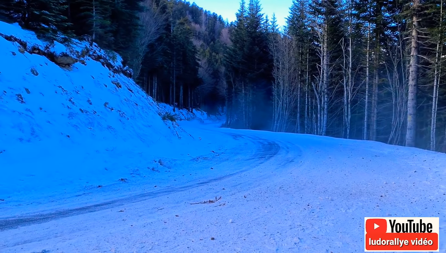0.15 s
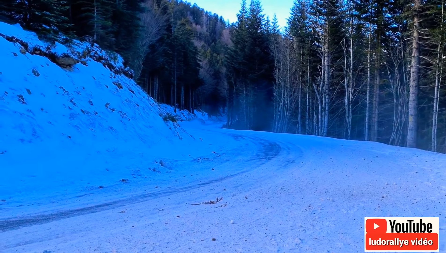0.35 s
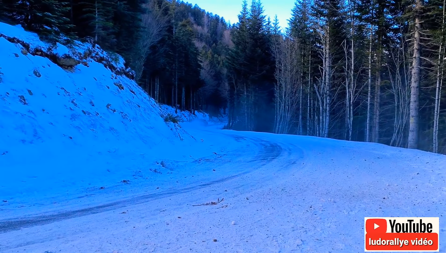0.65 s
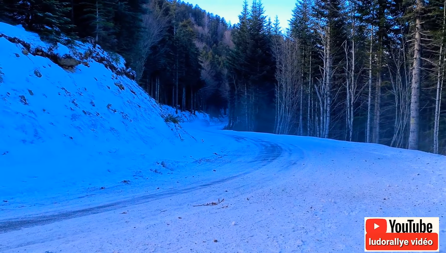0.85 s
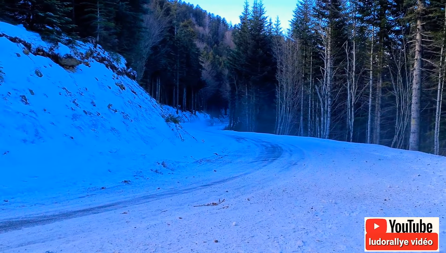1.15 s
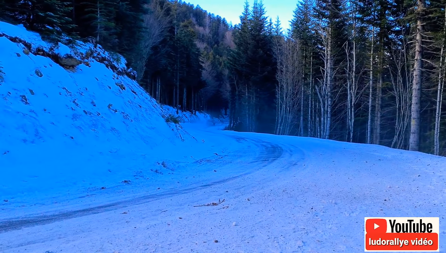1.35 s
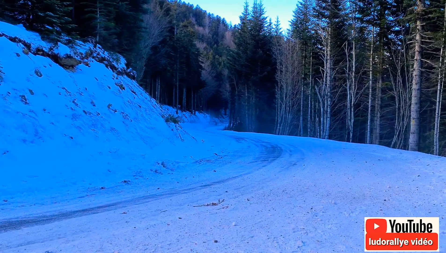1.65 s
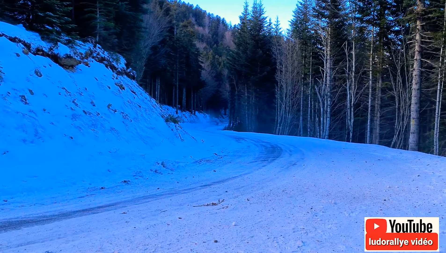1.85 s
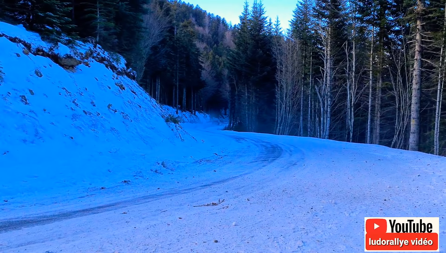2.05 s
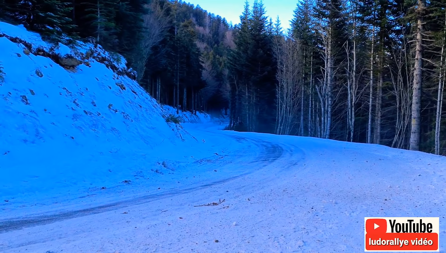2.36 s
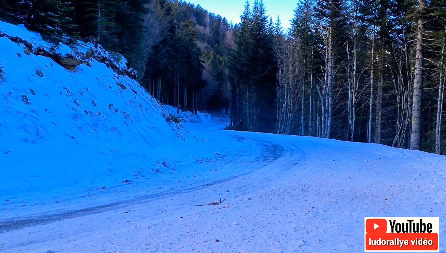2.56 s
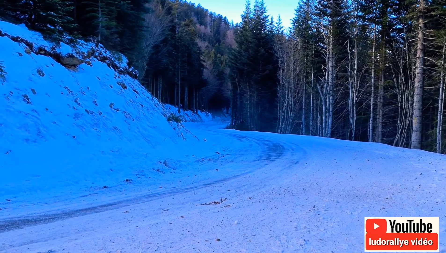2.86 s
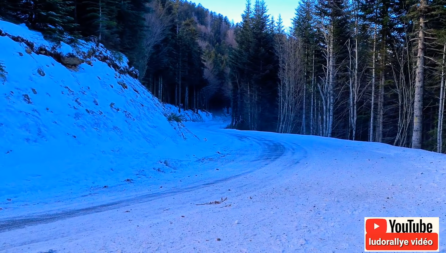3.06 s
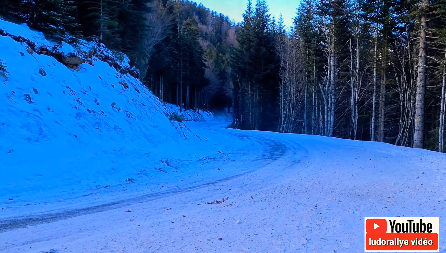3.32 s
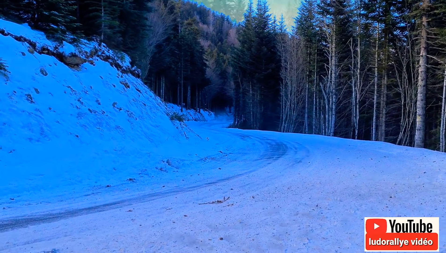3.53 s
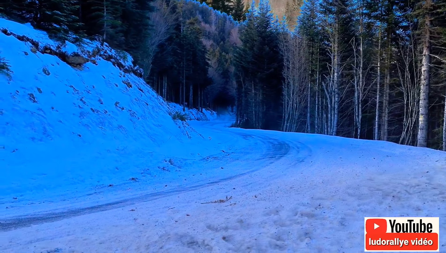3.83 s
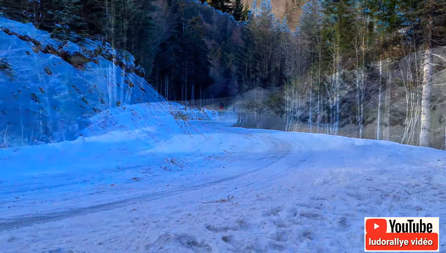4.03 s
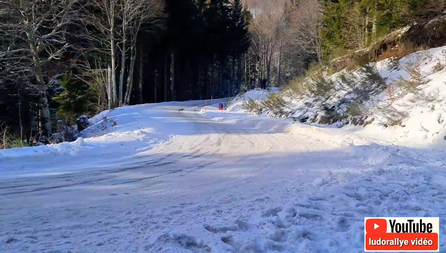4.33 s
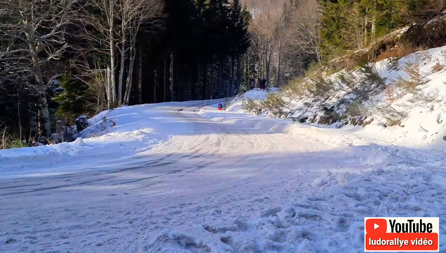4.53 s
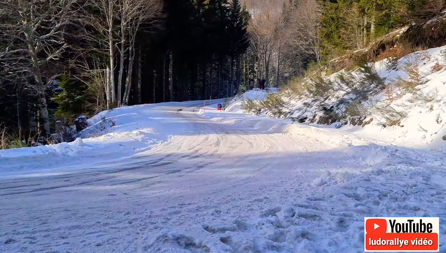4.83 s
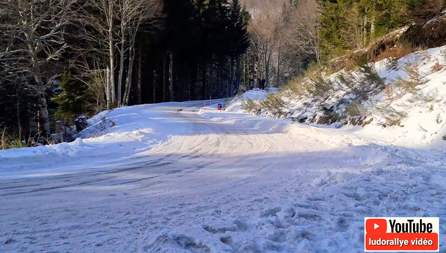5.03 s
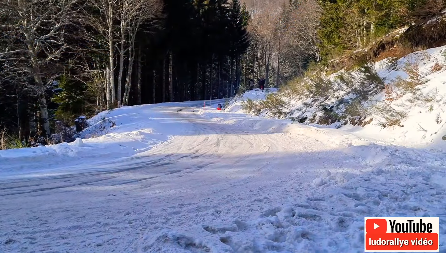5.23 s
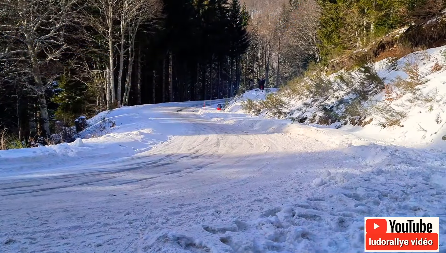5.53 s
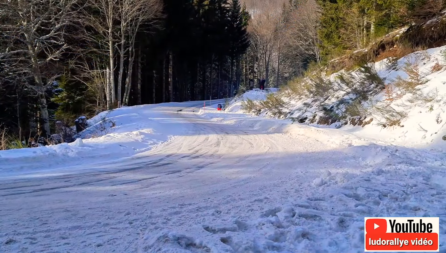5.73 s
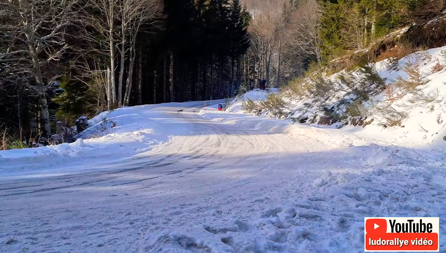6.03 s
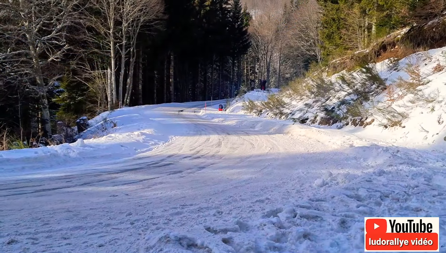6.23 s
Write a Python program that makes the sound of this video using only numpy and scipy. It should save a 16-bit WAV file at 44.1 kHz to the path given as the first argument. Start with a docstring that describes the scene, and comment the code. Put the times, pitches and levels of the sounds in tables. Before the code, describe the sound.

A rally engine rasps at full throttle close by, moving away over a gritty hiss of flung ice. A sharp backfire marks an upshift, then the exhaust crackles and fades to an uneven burble, echoing lightly among trees. Low gusts thump on the microphone while a second, distant engine rises in pitch and grows louder, its tyres rushing on packed snow.

```python
"""A snowy forest road, stereo microphone behind a four-cylinder turbo rally car. It pulls away,
wheels spinning and flinging ice, through two gear changes, the second with a bang. The driver lifts off,
unburnt fuel pops in the exhaust and the car burbles into the distance. Wind buffets the microphone, and
a far car comes on, accelerating, with tyre rush and a thin turbo whistle. Each engine note is a train
of firing pulses and gas puffs ringing in a tailpipe, echoed by snow banks and trunks."""
import sys
import numpy as np
from scipy import signal
from scipy.fft import rfft, irfft, next_fast_len
from scipy.io import wavfile
from scipy.ndimage import uniform_filter1d

SR = 44100
rng = np.random.default_rng(int(sys.argv[2]) if len(sys.argv) > 2 else 0)


def master_out(mix):
    """Clip the mix to full scale and print it as 16-bit PCM to the path in sys.argv[1]."""
    frames = np.transpose(np.atleast_2d(mix))
    ceiling = np.clip(frames, -1, 1)
    pcm = np.round(ceiling * 32767).astype(np.int16)
    wavfile.write(sys.argv[1], SR, pcm)


N = 281358
T = np.arange(N) / SR

CUT_S, RESUME_S, LIFT_S = 1.826, 1.885, 2.782  # throttle cut for the upshift, reopening, closed
SHUT_S, COAST_S = 0.00386, 3.22  # time the throttle takes to shut; end of the run-down

# Tailpipe resonances under throttle: pitch_hz, width_hz, lift_db
PULL_RESONANCES = [(830, 510, 5), (1270, 240, 6), (1905, 200, 13.5), (2330, 55, 5), (2723, 290, 8.5),
                   (3380, 330, 5.5), (4750, 180, 9.5), (5360, 86, 8), (9400, 7600, 5.5)]
# Tailpipe resonances off the throttle: pitch_hz, width_hz, lift_db
COAST_RESONANCES = [(224, 40, -6.5), (498, 44, 9.5), (703, 110, 5.5), (1160, 100, 1), (1920, 170, 11)]
# Spectrum of fuel going off in the pipe: frequency_hz, level_db
POP_SPECTRUM = [(40, -38.5), (130, -4.5), (260, 4), (400, -15), (520, -3.5), (740, 3.5), (860, -3.5),
                (1020, -15), (1300, -0.5), (1650, -20.5), (1950, -30), (2400, -37), (4000, -78)]
# Dabs of throttle while coasting: peak_s, length_s, lift_db
THROTTLE_DABS = [(3.278, .08, 6.5), (3.369, .11, 9), (3.497, .06, 8), (3.626, .08, 6), (3.778, .09, 8.5),
                 (3.868, .05, 4), (3.952, .06, 4), (4.084, .08, 4.5)]


def departing_car():
    """Under throttle, the tailpipe pointing back down the road at the microphone."""
    # Roughness of the firing: time_s, unevenness (0-1), jet_db
    roughness = [(0, .26, 5), (.95, .28, 4.5), (1.1, .17, 1.5), (1.8, .21, 3), (1.95, .32, 5),
                 (2.3, .27, 3.5), (2.7, .29, 4)]
    # Tailpipe spectrum: frequency_hz, level_db
    pipe_spectrum = [(40, -48.5), (120, -14.5), (200, -3.5), (300, -1.5), (400, -11), (490, -9.5), (560, 0),
                     (650, 5.5), (870, 0), (1000, -17), (1100, -14.5), (1450, -13.5), (1680, -27.5),
                     (3500, -35), (5600, -45.5), (7000, -67), (16000, -85.5)]
    # Wheelspin, then the two pulls: time_s, bass_db, middle_db, treble_db
    wheelspin = [(0.0, -14, -24, -39), (0.122, -13, -25.5, -43), (0.178, -17, -23.5, -43),
                 (0.196, -20, -27.5, -44), (0.48, -16.5, -25, -42.5), (0.53, -15.5, -29.5, -36.5),
                 (0.556, -15.5, -19.5, -46), (0.66, -17, -18.5, -40.5), (1.035, -15, -19, -38)]
    first_pull = [(1.066, -20, -14.5, -39.5), (1.166, -27, -18.5, -40), (1.494, -20, -20, -34.5),
                  (1.53, -17.5, -17, -38), (1.786, -20.5, -19.5, -39.5), (1.81, -19.5, -21, -46)]
    second_pull = [(1.9, -28.5, -20.5, -39.5), (2.008, -30, -20.5, -49), (2.302, -24, -21, -42.5),
                   (2.346, -23, -17.5, -41), (2.508, -22.5, -20, -39.5), (2.72, -24, -16.5, -39)]
    # Bands around the second (drone) and fourth (howl) harmonics: time_s, level_db
    drone_curve = [(.08, -29.5), (.21, -38.5), (.45, -24.5), (.88, -28.5), (.97, -35.5), (1.08, -25.5),
                   (1.27, -21.5), (1.4, -26.5), (1.55, -27), (1.72, -32), (1.92, -36), (2.25, -25.5),
                   (2.6, -23), (2.75, -26)]
    howl_curve = [(.1, -4), (.17, -2.5), (.3, 4.5), (.42, -1.5), (.58, -1), (.78, -8.5), (.95, -2.5),
                  (1.06, 4), (1.25, 1), (1.4, -7), (1.6, 0.5), (1.78, -7.5), (1.95, -2.5), (2.7, -5)]
    # The note falters as the spinning wheels catch: centre_s, length_s, change_db
    stumbles = [(.143, 0.016, -1.5), (.218, 0.037, -7.5), (.515, 0.033, -0.5), (.616, 0.023, -7)]
    uneven, jet_db = along(roughness)
    gas = exhaust(revs(), uneven, jet_db, waver=.009, chance=.38, stagger=.11, duty=.25)
    pipe = colour(gas, pipe_spectrum, PULL_RESONANCES)
    pipe = pipe + amp(-4) * scatter(above(pipe, 1000), t60=.12, per_s=700)
    pipe = pipe + amp(-9) * scatter(above(pipe, 1000), t60=.15, per_s=900, channels=2)
    pipe = pipe + amp(-11) * scatter(above(pipe, 2200), t60=.1, per_s=700, channels=2)
    pipe = flutter(pipe, above_hz=600, depth_db=3.4, patch_hz=300)
    off_boost = ramp(CUT_S, SHUT_S) - ramp(1.8, 0.21)  # a thin snarl until the boost returns
    low, middle, howl, high = registers(pipe, [630, 745, 1030])
    pipe = low * amp(-13 * off_boost) + middle + howl * amp(along(howl_curve)[0]) + high
    cut_db, reopen_s = -10.5, 0.12
    cut = ramp(CUT_S, SHUT_S) - ramp(RESUME_S - reopen_s / 2, reopen_s)
    throttle = amp(cut_db * cut) * (1 - ramp(LIFT_S, SHUT_S))
    boom, body, rasp = along(np.vstack([wheelspin, first_pull, second_pull]))
    drone = along(drone_curve)[0]
    bark = 1 + 0.49 * rasp + 0.51 * body  # the upper harmonics lie between middle and treble
    falter = bumps(stumbles)
    levels = [boom, drone + falter / 2, body + falter + 0.1 * shudder(), bark + falter / 2, rasp]
    return throttle * voiced(pipe, [294, 490, 1030, 2130], levels, sway_db=0.8)


def exhaust(firing_hz, uneven, jet_db, waver, chance, stagger, duty):
    """One pressure pulse per firing, each followed by a puff of turbulent gas."""
    # Strength of each of the four cylinders at full unevenness: offset (share of a plain firing)
    cylinders = [0.43, -0.034, 0.51, 0.3]
    # Spectrum of the gas jet ahead of the pipe's colour: frequency_hz, level_db
    jet_spectrum = [(100, -21), (700, -19), (1050, -8), (1400, -5), (2200, -3), (3500, 1), (7000, 5)]
    phase = np.cumsum(firing_hz * (1 + waver * drift(35.5))) / SR
    firings = np.arange(1, int(phase[-1]))
    luck, late = rng.standard_normal((len(firings), 2)).T
    odd = np.interp(firings, phase, uneven)
    bias = np.resize(cylinders, len(firings))
    strength = np.maximum(1 + odd * (bias + chance * luck), .05)
    lag = stagger * odd * (chance * late - bias)  # weak firings leave late
    at = np.clip(np.interp(firings + lag, phase, np.arange(N)), 0, N - 2)
    sample, fraction = at.astype(int), at % 1
    pulses = np.bincount(sample, strength * (1 - fraction), N)
    pulses += np.bincount(sample + 1, strength * fraction, N)
    puff = (.4 + np.exp(-(phase % 1) / duty)) * np.interp(phase, firings, strength)
    puff *= amp(2.8 * drift(35))
    noise = rng.standard_normal((2, N))
    noise = noise + below(noise[0] - noise, 1200, order=4)  # the lows reach left and right alike
    return unit(pulses) + amp(jet_db) * colour(unit(noise * puff), jet_spectrum)


def revs():
    """Firings per second: the first pull, a shuddering climb after the upshift, then the run-down."""
    # Wheelspin and first pull, dropping at the first gear change: time_s, firing_hz
    first_revs = [(0.0, 223), (0.075, 232), (0.126, 225), (0.16, 211), (0.2, 227), (0.25, 217), (0.33, 204),
                  (0.37, 211), (0.47, 216), (0.52, 212), (0.565, 204), (0.605, 220), (0.655, 208),
                  (0.76, 219), (0.83, 222), (0.87, 232), (0.925, 224), (0.98, 224.5), (1.03, 223),
                  (1.06, 199.4), (1.245, 198), (1.39, 200), (1.6, 213), (1.73, 211), (1.775, 201),
                  (1.82, 233)]
    grip_s, climb_hz_per_s, run_down_hz_per_s, dab_hz_per_db = 1.05, 18, 150, 1.43
    first = along(first_revs)[0] * (1 + .011 * drift(13) * (T < grip_s))  # wavers while the wheels spin
    second = (173.1 + climb_hz_per_s * (T - RESUME_S)) * (1 + .037 * shudder())
    coast = 108.8 + run_down_hz_per_s * np.maximum(COAST_S - T, 0) + dab_hz_per_db * bumps(THROTTLE_DABS)
    return np.select([T < CUT_S + SHUT_S, T < LIFT_S], [first, second], coast)


def shudder():
    """The drivetrain winds up and unwinds after the upshift, a swing from -1 to 1."""
    # Crests of the swing: time_s
    crests = [1.88, 1.978, 2.075, 2.168, 2.268, 2.37, 2.483, 2.585, 2.675, 2.77]
    return np.cos(2 * np.pi * np.interp(T, crests, np.arange(len(crests)))) * (T > CUT_S + SHUT_S)


def coasting_car():
    """Rolling away off the throttle, the cylinders fire unevenly and the pipe rings on between them."""
    # Tailpipe spectrum: frequency_hz, level_db
    pipe_spectrum = [(50, -27), (120, -15), (225, 3.5), (330, -9.5), (490, -3), (600, -3.5), (760, -0.5),
                     (860, -10.5), (980, -15.5), (1350, -2.5), (1650, -20), (3000, -40), (5400, -51.5),
                     (7000, -86.5), (16000, -89.5)]
    # Body, bark and rasp of the engine: level_db, fade_db_per_s, share (of each dab's lift)
    bands = [(-27, 5.5, 0.9), (-44.5, 8, 0.43), (-63, 6, 0.32)]
    dabs = bumps(THROTTLE_DABS)
    uneven = .62 - .045 * dabs  # each dab steadies the firing
    gas = exhaust(revs(), uneven, jet_db=3, waver=.02, chance=.6, stagger=.1, duty=.2)
    pipe = colour(gas, pipe_spectrum, COAST_RESONANCES)
    echoes = scatter(pipe, t60=.3, per_s=900) + scatter(above(pipe, 1100), t60=.12, per_s=1200)
    pipe = flutter(pipe + amp(-4) * echoes, above_hz=1300, depth_db=4, patch_hz=450)
    dip_db = -15.5 * (1 - ramp(COAST_S - .05, 0.026))  # quieter under the thick of the pops
    levels = [db - fade * (T - COAST_S) + share * dabs + dip_db for db, fade, share in bands]
    in_earshot = ramp(LIFT_S, SHUT_S) - ramp(4.217, 0.15)
    return voiced(pipe, [1000, 2200], levels, sway_db=0.5) * in_earshot


def backfires():
    """A shock and a flame, a ringing pipe, a ragged low tail and a hiss of escaping gas."""
    # Bangs at the upshift and the lift-off: start_s, level_db
    bangs = [(1.8542, -0.5), (2.774, -5.5)]
    # Spectrum of shock and flame: frequency_hz, level_db
    bang_spectrum = [(30, -29.5), (120, 0), (250, 0.5), (420, -0.5), (600, 5.5), (850, -2), (1100, -17.5),
                     (1800, -11), (2500, -23.5), (5300, -27), (7500, -40), (11000, -34.5), (16000, -59)]
    hiss_spectrum = [(2000, -22.5), (5000, 0.5), (9000, -6.0), (16000, -13.0)]
    out, t = np.zeros((2, N)), T[:9000]
    shock = colour(1. * (t == 0), bang_spectrum)
    shock = shock / abs(shock).max()
    ring = np.sin(2 * np.pi * 800 * t) * np.exp(-t / 0.0094)
    for s, db in bangs:
        flame = unit(colour(rng.standard_normal(len(t)), bang_spectrum)) * np.exp(-t / 0.0097)
        tail = unit(colour(rng.standard_normal(len(t)), POP_SPECTRUM)) * np.exp(-t / 0.014)
        grumble = unit(registers(rng.standard_normal(len(t)), [70, 520])[1]) * np.exp(-t / 0.087)
        hiss = colour(rng.standard_normal((2, len(t))), hiss_spectrum) * np.exp(-(t / 0.097) ** 2)
        add(out, s, amp(db - 2.5) * shock + amp(db - 16) * ring + amp(db - 12) * flame)
        add(out, s, amp(db - 12) * tail + amp(db - 42.5) * hiss + amp(db - 26) * grumble)
        add(out, s + .0032, amp(db - 7) * shock)  # bounce off the road
    return out


def pops():
    """Unburnt fuel flares in the pipe: a ringing thud and a crackle, run together by the snow banks."""
    # Flares in twos and threes, then fading sputters: start_s, level_db, crackle_offset_db
    flares = [(2.755, 1, -17.5), (2.769, -6.5, -5), (2.779, -10, -25), (2.811, -6.5, -21),
              (2.821, -5, -10.5), (2.838, -29, -26), (2.858, -10.5, -13.5), (2.876, -13.5, -20.5),
              (2.913, -10, -23), (2.93, -12, -26), (2.958, -7, -18.5), (2.976, -10.5, -20),
              (3.009, -8.5, -18.5), (3.024, -15, -28), (3.062, -7, -19.5), (3.079, -13.5, -18),
              (3.108, -10, -24), (3.119, -13, -27), (3.133, -16.5, -22.5), (3.149, -8, -16),
              (3.166, -18.5, -26.5), (3.203, -11.5, -33), (3.222, -16.5, -22.5), (3.281, -17.5, -20.5),
              (3.342, -16.5, -24), (3.38, -19.5, -22.5), (3.476, -22.5, -27.5), (3.497, -18.5, -24),
              (3.572, -26.5, -30), (3.611, -18.5, -29), (3.638, -24, -25.5), (3.745, -26, -22),
              (3.764, -16.5, -28)]
    # Thud, ring and bark of every pop: offset_db
    band_levels = [-22, -15.5, -25.5]
    # Spectrum of the crackle: frequency_hz, level_db
    crackle_spectrum = [(800, -20), (2000, 9.5), (2700, 9), (4000, 2.5), (5000, 4.5), (7000, -22),
                        (11000, -35), (16000, -41)]
    rise_s, burn_s = 0.0024, 0.0059
    out, t = np.zeros((2, N)), T[:2600]
    envelope = np.exp(-t / burn_s) * (1 - np.exp(-t / rise_s))
    for s, db, crackle_db in flares:
        flare = rng.standard_normal((3, len(t))) * envelope
        ringing = colour(flare[0], POP_SPECTRUM, COAST_RESONANCES)
        for band, band_db in zip(registers(ringing, [400, 1030]), band_levels):
            add(out, s, amp(db + band_db) * unit(band))
        crackle = colour(flare[1:] * np.minimum(t / 0.004, 1), crackle_spectrum)
        add(out, s, amp(db + crackle_db - 19) * unit(crackle))
    return out + amp(-11.5) * scatter(out, t60=.25, per_s=1200)


def ice_spray():
    """Thousands of tiny chips flung by the tyres merge into a grainy hiss that comes in surges."""
    # Surges of spray: time_s, level_db
    surges = [(0, -36), (.1, -40), (.3, -45), (.64, -43), (.7, -38), (.8, -45), (.9, -37.5), (1.2, -43.5),
              (1.36, -34), (1.55, -35.5), (1.75, -43.5), (1.95, -55), (2.5, -60.5), (2.8, -81), (4.2, -66),
              (4.4, -110)]
    # The tyres bite and fling a thicker burst: peak_s, length_s, lift_db
    kicks = [(.175, 0.019, 7.5), (.565, 0.035, 9.5), (.675, .012, 11.5), (.9, .04, 5)]
    # Spectrum of the chips: frequency_hz, level_db
    chip_spectrum = [(900, -24.5), (2000, -1), (3200, 2), (5400, -6.5), (7500, -20), (10500, -22),
                     (15000, -33.5)]
    chips_per_s = 5000
    sizes = amp(3.2 * np.minimum(rng.exponential(1, N), 5)) * (rng.random(N) < chips_per_s / SR)
    energy = signal.oaconvolve(sizes ** 2, np.exp(-T[:400] / .001))[:N]
    strikes = np.sqrt(abs(energy)) * amp(1.3 * drift(22))
    hiss = colour(strikes * rng.standard_normal((2, N)), chip_spectrum, PULL_RESONANCES)
    return amp(along(surges)[0] + bumps(kicks)) * unit(hiss)


def oncoming_car():
    """A far engine, its wavering note reaching the microphone partly by way of the trees."""
    # Climbing revs: time_s, firing_hz
    far_revs = [(5.2, 160), (5.33, 164), (5.43, 171), (5.53, 177.5), (5.62, 171), (5.67, 182), (5.74, 174),
                (5.8, 191), (5.85, 194), (5.95, 208), (5.99, 205), (6.04, 216), (6.08, 213), (6.21, 235),
                (6.25, 227), (6.3, 229), (6.37, 224)]
    # Coming out from behind the bend: time_s, bass_db, low_middle_db, high_middle_db, treble_db
    approach = [(4.3, -58, -54.5, -58, -65), (5.15, -52, -56, -60.5, -59.5), (5.34, -53, -56, -45.5, -50.5),
                (5.44, -53, -47, -35.5, -42.5), (5.56, -38, -38, -39.5, -45.5),
                (5.72, -41.5, -41, -45, -43), (5.83, -46.5, -43, -34, -37.5),
                (5.97, -38, -40, -23.5, -38.5), (6.05, -32, -26.5, -35, -32.5),
                (6.11, -39.5, -32.5, -35, -33.5), (6.2, -35.5, -26, -26.5, -26),
                (6.27, -29, -41, -31, -35.5), (6.37, -39.5, -34, -35.5, -41.5)]
    # Exhaust spectrum at a distance: frequency_hz, level_db
    spectrum = [(100, -33), (230, -5), (430, -1), (550, 4), (680, 16), (860, 13), (1100, -2), (1400, 3.5),
                (1800, -13.5), (2200, -11), (3500, -39), (5500, -50), (7000, -67), (15000, -81.5)]
    # Its resonances: pitch_hz, width_hz, lift_db
    resonances = [(670, 99, 1), (810, 110, 2), (1440, 280, 4.5)]
    gas = exhaust(along(far_revs)[0], np.full(N, .3), 0, waver=.012, chance=.55, stagger=.11, duty=.5)
    note = colour(gas, spectrum, resonances)
    short_echoes = amp(-9) * scatter(note, t60=.2, per_s=900)
    note = note + short_echoes + amp(-13) * scatter(note, t60=.9, per_s=1500)
    note = note + amp(-16) * scatter(note, t60=.5, per_s=1500, channels=2)
    note = flutter(note, above_hz=700, depth_db=3.5, patch_hz=260)
    return voiced(note, [570, 750, 1050], along(approach), sway_db=2.3) * ramp(4.22, 0.26)


def tyres():
    """The far car's studded tyres on packed snow: an even rush that swells and brightens as they near."""
    # Approach of the tyres: time_s, level_db
    approach = [(4.3, -68), (5.1, -59.5), (5.35, -56), (5.55, -40.5), (5.75, -40), (5.95, -37),
                (6.1, -33.5), (6.22, -34), (6.37, -37)]
    # Spectrum of the rush: frequency_hz, level_db
    spectrum = [(100, -25.5), (500, -9), (850, 6), (1150, -8), (1450, 0.5), (1850, -6), (3000, -12),
                (4000, -19), (5500, -22.5), (7000, -39), (10000, -43.5), (15000, -55.5)]
    noise = rng.standard_normal((3, N))
    rush = unit(colour(noise[2] + 0.3 * noise[:2], spectrum))
    level_db = along(approach)[0]
    low, high = registers(rush, [4200])
    dulling_db = 0.9 * (level_db - level_db.max())  # treble lost with distance
    return amp(level_db) * (low + high * amp(dulling_db)) * ramp(4.1, 0.12)


def turbo():
    """A thin, hissing whistle that runs ahead of the oncoming engine."""
    # Swell of the whistle: time_s, level_db
    swell = [(4.6, -88), (4.95, -70), (5.3, -65), (5.5, -56.5), (5.8, -57)]
    # Its spectrum: frequency_hz, level_db
    spectrum = [(1500, -34), (3000, -9), (3500, -11.5), (4000, -17.5), (6000, -49.5)]
    noise = rng.standard_normal((3, N))
    whistle = unit(colour(noise[:2] + noise[2], spectrum, [(3520, 220, 7.1)]))
    return amp(along(swell)[0]) * whistle * ramp(4.4, 0.33)


def wind():
    """Rumble and short eddies on one side of the microphone or both, over the hush of the forest."""
    # Strong gusts: peak_s, half_length_s, left_db, right_db, upper_edge_hz
    gusts = [(4.097, 0.062, -43, -15.5, 345.3), (4.326, 0.027, -23, -24.5, 601.3),
             (4.42, 0.1, -25, -26, 361), (4.689, 0.016, -17.5, -27, 657), (4.703, 0.03, -16.5, -17, 434),
             (4.727, 0.056, -19, -13.5, 388), (4.771, 0.025, -26, -8.5, 207), (4.83, 0.046, -47, -7.5, 295),
             (4.85, 0.034, -26, -6.5, 91), (4.949, 0.037, -39, -7, 426), (5.215, 0.042, -17.5, -19.5, 400),
             (5.273, 0.12, -19, -21.5, 513), (5.372, 0.047, -26.5, -28, 387), (5.61, 0.12, -20, -25.5, 442),
             (5.964, 0.094, -25, -25, 340)]
    # Spectra of the rumble and of the forest air: frequency_hz, level_db
    rumble_spectrum = [(15, -20), (40, 1), (72, 1.5), (130, -5.5), (250, -14), (500, -21.5), (1200, -49),
                       (4000, -75)]
    air_spectrum = [(50, -5), (700, -3.5), (1500, -19.5), (2050, -24.5), (3000, -34.5), (6000, -48),
                    (15000, -55.5)]
    calm_db, breeze_db, breeze_s, rise_s = -41.5, -31, 3.55, 0.368
    noise = rng.standard_normal((3, N))  # left, right, common to both
    rumble_db = calm_db + (breeze_db - calm_db) * ramp(breeze_s, rise_s)
    out = amp(rumble_db) * unit(colour(noise[:2] + noise[2], rumble_spectrum))
    weak_gusts = [(s, .035, *(-28.5 - 0.5 * rng.standard_normal(2)), 250)
                  for s in rng.uniform(breeze_s + rise_s, T[-1], size=4)]
    turbulence = noise[:2] + 0.71 * noise[2]
    for s, half_s, left_db, right_db, edge_hz in list(gusts) + weak_gusts:
        swell = np.hanning(int(2 * half_s * SR)) ** 3
        eddy = below(turbulence[:, int(s * SR) - 9000:][:, :len(swell)], edge_hz, order=4)
        eddy = above(eddy, 0.15 * edge_hz, order=4) * swell
        add(out, s - half_s, amp([[left_db], [right_db]]) * amp(-7.5) * eddy / eddy.std(1, keepdims=True))
    return out + amp(-49) * unit(colour(rng.standard_normal((2, N)), air_spectrum))


def ticks():
    """Dry ticks on the right; on the left a thin passing hiss and a faint click between the two cars."""
    # Ticks, and the click at 4.39 s: start_s, pitch_hz, decay_s, left_db, right_db
    ticks_and_click = [(4.213, 3000, .004, -50, -35), (4.391, 4200, .0005, -32, -48),
                       (4.392, 1800, .0005, -42, -54), (4.644, 1350, .007, -50, -32),
                       (4.846, 700, .002, -44, -12), (4.847, 2000, .002, -50, -29)]
    hiss_spectrum = [(2500, -31), (5400, 11), (8500, -21), (11500, -9), (13000, -36)]
    out, t = np.zeros((2, N)), T[:2000]
    for s, hz, decay_s, left_db, right_db in ticks_and_click:
        spectrum = [(hz / 2, -18), (hz, 0), (hz * 1.5, -14), (hz * 3, -36), (hz * 5, -62), (hz * 20, -105)]
        tick = colour(rng.standard_normal(len(t)) * np.exp(-t / decay_s), spectrum)
        add(out, s, amp([[left_db], [right_db]]) * tick / abs(tick).max())
    hiss = unit(colour(rng.standard_normal((2, N)), hiss_spectrum))
    return out + hiss * amp([[-62], [-72]]) * np.exp(-((T - 4.1) / 0.21) ** 2)


def scatter(x, t60, per_s, channels=1):
    """Sparse echoes from snow banks and trunks; three sets of paths take turns as the car moves."""
    t, out, turn_hz = T[:int(t60 * SR)], 0, 1.3
    turn = 2 * np.pi * (turn_hz * T + rng.random())
    for shift in np.pi * np.arange(3) / 3:
        signs = rng.choice([-1., 1.], (channels, len(t)))
        arrivals = (rng.random(signs.shape) < per_s / SR) * (t > .006)
        taps = signs * arrivals * amp(-60 * t / t60)
        taps /= np.linalg.norm(taps, axis=1, keepdims=True)
        out = out + signal.oaconvolve(x * np.cos(turn + shift), taps, axes=1)[:, :N]
    return out * np.sqrt(2 / 3)


def flutter(x, above_hz, depth_db, patch_hz):
    """Moving air and shifting reflections make the upper bands swell and fade, each on its own."""
    hz, _, frames = signal.stft(x, SR, nperseg=512)
    patches = uniform_filter1d(rng.standard_normal(frames.shape[1:]), int(patch_hz * 512 / SR), axis=0)
    patches = unit(uniform_filter1d(patches, size=6, axis=1))
    frames = frames * amp(depth_db * patches * np.clip(hz / above_hz - .5, 0, 1)[:, None])
    return signal.istft(frames, SR, nperseg=512)[1][:, :N]


def voiced(x, edges_hz, levels_db, sway_db):
    """Gives each register of an engine its own loudness, swaying a little at random."""
    out = 0
    for band, db in zip(registers(x, edges_hz), levels_db):
        power = uniform_filter1d(uniform_filter1d(band.mean(0) ** 2, size=2000), size=2000)
        out = out + band * amp(db + sway_db * drift(31)) / np.sqrt(abs(power) + 1e-14)
    return out


def colour(x, spectrum, resonances=(), size=4096):
    """Causal filter from a spectrum (frequency_hz, level_db) and its resonances."""
    hz = abs(np.fft.fftfreq(size, 1 / SR))
    point_hz, point_db = np.transpose(spectrum)
    db = np.interp(np.log(hz + 1), np.log(point_hz), point_db)
    db += sum(lift / (1 + (2 * (hz - f) / width) ** 2) for f, width, lift in resonances)
    taps = np.fft.ifft(np.exp(np.conj(signal.hilbert(np.log(amp(db)))))).real  # minimum phase
    return signal.oaconvolve(np.atleast_2d(x), taps[None], axes=1)[:, :x.shape[-1]]


def registers(x, edges_hz):
    """Splits a sound into adjoining bands."""
    lows = [0] + [below(x, hz, order=16) for hz in edges_hz] + [x]
    return [high - low for low, high in zip(lows, lows[1:])]


def below(x, hz, order=8):
    """Smooth low-pass without delay."""
    size = next_fast_len(x.shape[-1] + 4096)
    loss = 1 + (np.fft.rfftfreq(size, 1 / SR) / hz) ** order
    return irfft(rfft(x, size) / loss, size)[..., :x.shape[-1]]


def above(x, hz, order=8):
    """The matching high-pass."""
    return x - below(x, hz, order)


def drift(hz):
    """Slow random wander of unit size."""
    return unit(below(rng.standard_normal(N), hz, order=4))


def along(rows):
    """Every column of a curve table at every sample."""
    s, *columns = np.transpose(rows)
    return [np.interp(T, s, c) for c in columns]


def bumps(rows):
    """Brief rounded swells or dips, in dB."""
    return sum(db * np.exp(-np.log(2) * (2 * (T - s) / length) ** 4) for s, length, db in rows)


def ramp(start_s, length_s):
    """Rises from 0 to 1."""
    return np.clip((T - start_s) / length_s, 0, 1)


def add(mix, start_s, sound):
    part = mix[:, max(round(start_s * SR), 0):][:, :sound.shape[-1]]
    part += sound[..., :part.shape[1]]


def amp(db):
    return 10 ** (np.asarray(db) / 20)


def unit(x):
    return x / np.sqrt(np.mean(x ** 2) + 1e-20)


def scene():
    """The near car and its forest echo, then the far car, the wind and the ticks."""
    # Stereo lean of the near car: frequency_hz, left_minus_right_db
    lean = [(200, -.5), (440, -.8), (730, .5), (2000, 1.5), (3250, -1), (5000, -8), (12000, -5)]
    car = departing_car() + coasting_car() + pops() + backfires() + ice_spray()
    left = colour(car[0], [(hz, db / 2) for hz, db in lean])
    right = colour(car[1], [(hz, -db / 2) for hz, db in lean])
    car = np.vstack([left, right])
    forest = scatter(below(car, 4000, order=4) - below(car, 320), t60=.8, per_s=2000, channels=2)
    return car + amp(-14) * forest + oncoming_car() + tyres() + turbo() + wind() + ticks()


def record(dry):
    """The microphone signal clips at full scale and loses its top treble."""
    band_limit = signal.firwin(511, 15750, window=("kaiser", 9), fs=SR)
    return signal.oaconvolve(np.clip(dry, -1, 1), band_limit[None], "same")


dry = scene()
out = record(dry)
master_out(out)
```